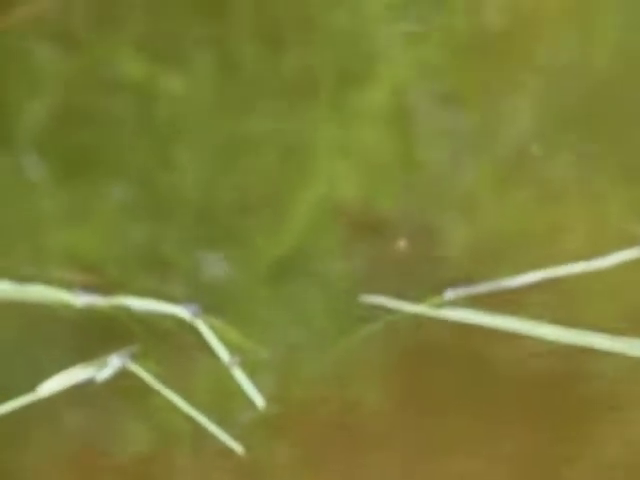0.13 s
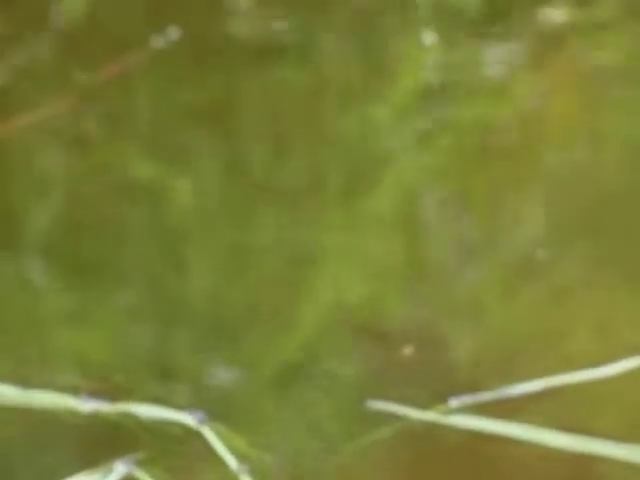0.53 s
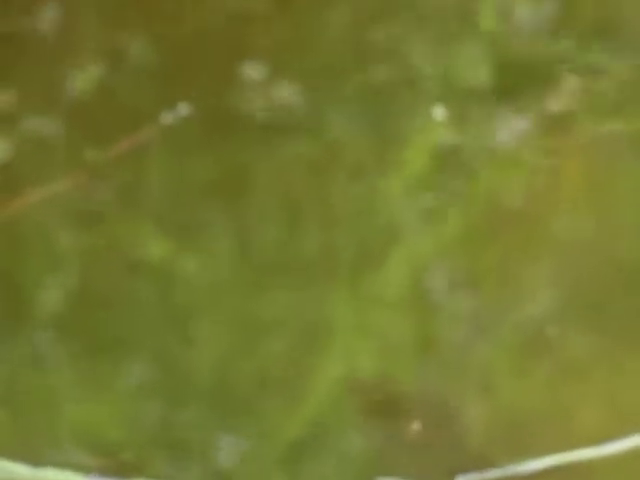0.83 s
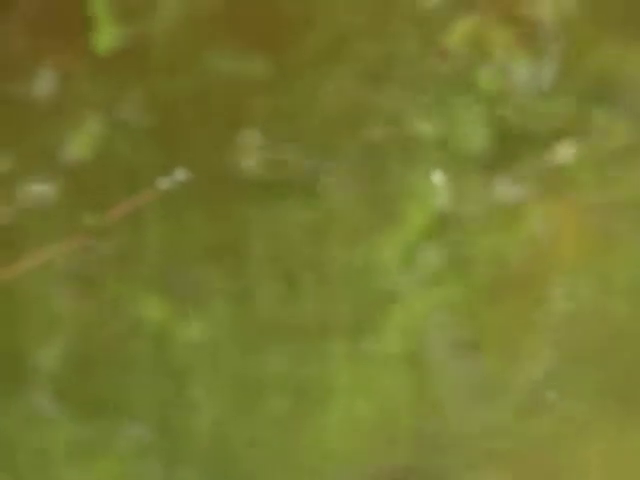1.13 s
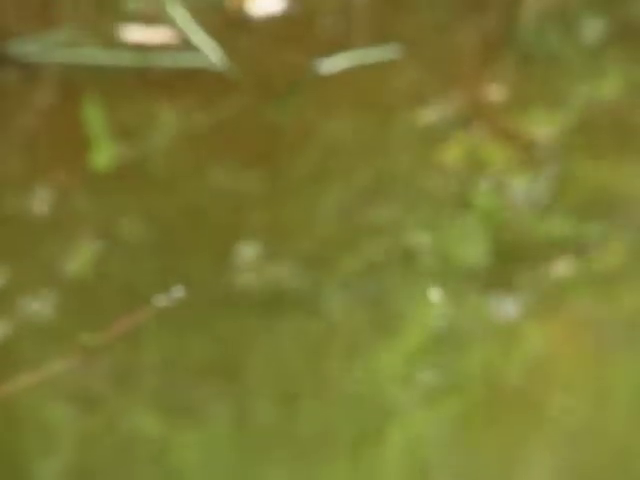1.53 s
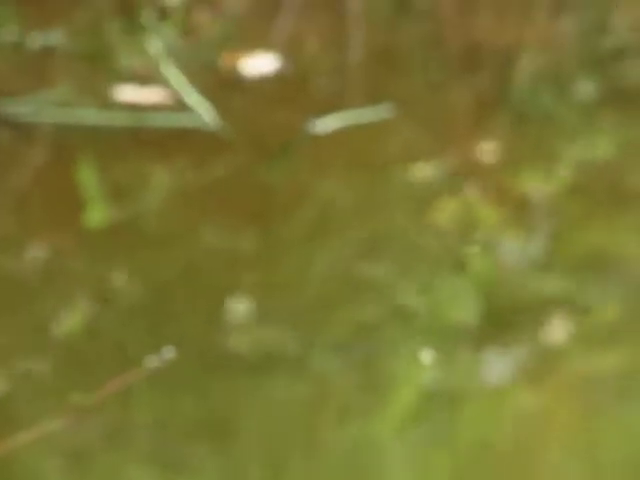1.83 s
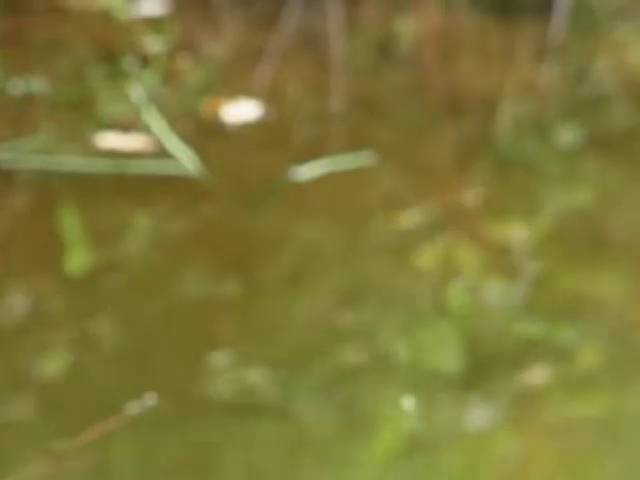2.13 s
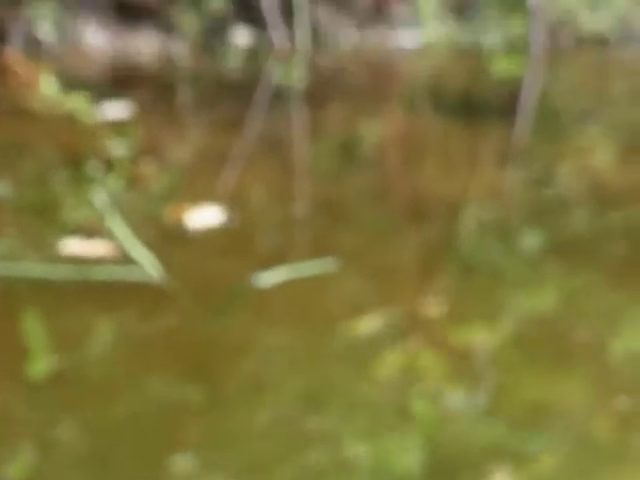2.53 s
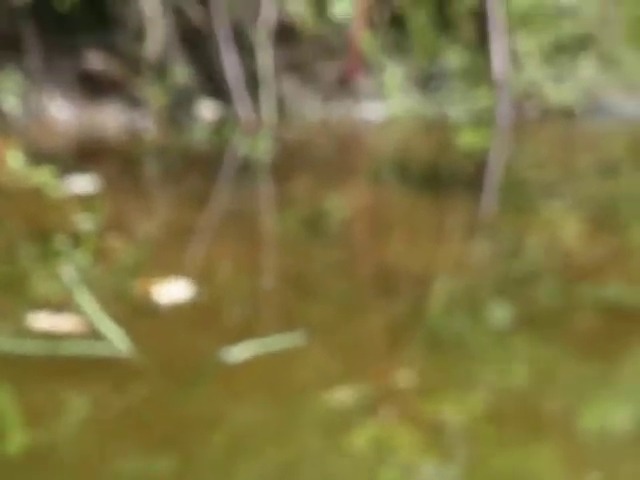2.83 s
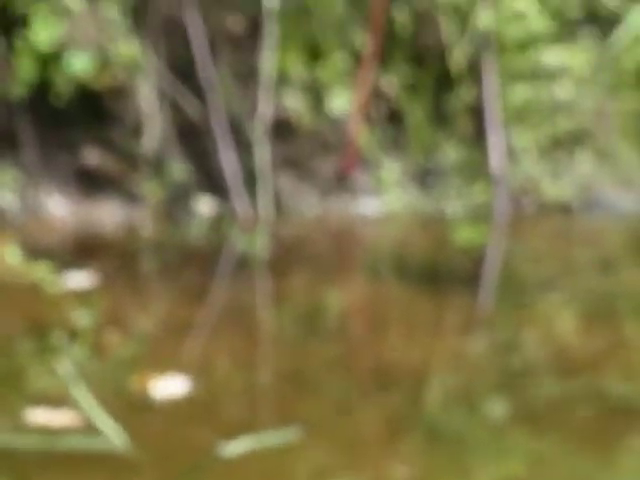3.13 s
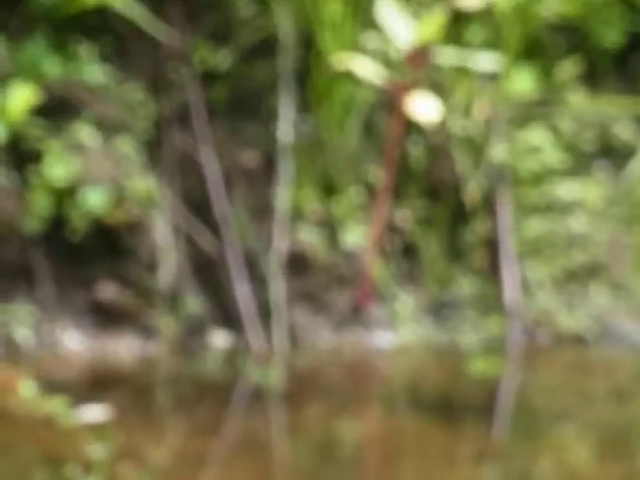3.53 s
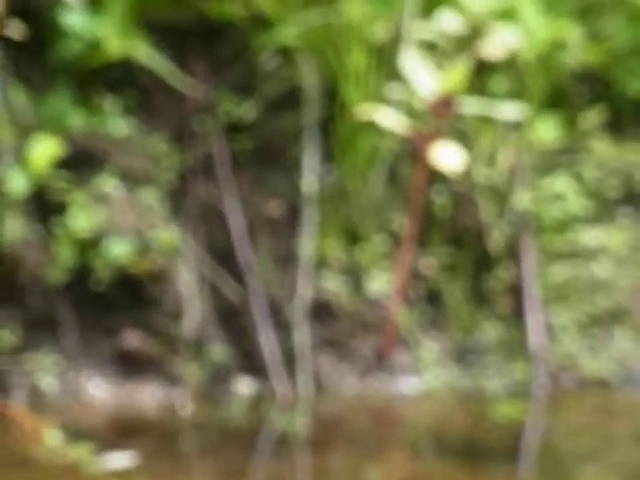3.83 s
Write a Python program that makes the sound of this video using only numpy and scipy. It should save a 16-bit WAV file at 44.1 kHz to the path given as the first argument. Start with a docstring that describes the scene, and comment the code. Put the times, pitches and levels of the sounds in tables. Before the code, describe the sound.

Soft, regular toad hoots carry on throughout beside a pond, faintly answered by a lower, distant toad. After a dry click close to the microphone, birds whistle and chirp, gradually getting louder, and a small hard knock comes last.

```python
"""At the edge of a pond, one microphone, quiet outdoor hiss throughout. A near toad starts at once,
hooting softly and regularly on pushes of air. Small birds whistle and chip in the trees around, which
throw their notes back, and a dry click sounds close to the microphone. A lower toad answers from far
off; faint high rustles and ticks come and go. From about halfway the birds trill and grow louder.
Near the end come a soft bump and a second sharp click, a hard little knock close by."""
import sys
import numpy as np
from scipy import signal
from scipy.fft import rfft, irfft
from scipy.io import wavfile

SR = 44100
rng = np.random.default_rng(int(sys.argv[2]) if len(sys.argv) > 2 else 0)


def unload_audio(sound):
    """Save the sound as a 16-bit wav file, at the path given as the first command line argument."""
    columns = np.transpose(np.atleast_2d(sound))
    # keep every value between -1 and 1, then stretch to whole-number steps
    steps = np.round(np.clip(columns, -1, 1) * 32767)
    wavfile.write(sys.argv[1], SR, steps.astype(np.int16))


N = 176400
TIME = np.arange(N) / SR

# Spectrum of the open air: f/Hz, relative level/dB
AIR_COLOUR = [(25, -20), (50, -11.5), (100, -7), (180, -6.5), (290, -5), (420, -7), (700, -9),
              (1600, -12.5), (2700, -11), (6000, -15), (11400, -17), (15800, -20.5)]
# Hoots of the toad at the near bank: t/s, length/s, f/Hz, level/dB
NEAR_HOOTS = [(0.085, 0.16, 554.6, -37.5), (.542, 0.17, 554, -37.5), (0.951, 0.16, 556, -37),
              (1.367, 0.17, 555.6, -37.5), (1.791, 0.16, 554.6, -37), (2.219, 0.16, 553.3, -37.5),
              (2.625, 0.16, 554.7, -37.5), (3.048, 0.16, 555.7, -37.5), (3.479, 0.17, 554.6, -37.5),
              (3.911, 0.14, 552.6, -38)]
# How long the trees hold an echo: f/Hz, time to fall 60 dB/s
TREE_DECAY = [(500, 1), (2500, 1), (5000, 0.45), (9000, 0.37)]
# Bird notes in the trees: t/s, length/s, start f/Hz, turn f/Hz, end f/Hz, place of the turn (0-1),
# flatness of the turn (exponent), level/dB, swell over the note/dB, echo/dB
BIRD_NOTES = [(0.096, .045, 7000, 5300, 5300, 0.73, 1.6, -54.5, -5, -5),
              (0.44, .045, 6700, 4850, 4520, 0.28, 1.7, -54, -10, -2),
              (1.054, 0.046, 5600, 5180, 4700, 0.6, 1.04, -61.5, 2, 5),
              (1.199, 0.064, 5200, 4630, 4270, 0.32, 0.96, -49.5, -8, 1.5),
              (1.207, 0.088, 2940, 2740, 2390, 0.06, 1.2, -60.5, -2, -0.5),
              (1.23, 0.023, 2990, 3520, 3930, 0.44, 1, -57.5, 4, 1),
              (1.344, 0.035, 4400, 3610, 2880, 0.75, 1.25, -55.5, 10, 2.5),
              (1.373, 0.1, 8200, 8000, 7340, 0.43, 0.84, -56, 7, 2.5),
              (1.475, 0.044, 5200, 3800, 3250, 0.6, 1.2, -57, -1, 4),
              (1.515, .075, 3150, 3900, 3920, 0.8, 1.8, -54.5, -3, 1.5),
              (1.635, .04, 4000, 3575, 3020, 0.62, 1.03, -50, 6, -1.5),
              (1.71, 0.06, 6400, 7070, 6420, 0.53, 0.98, -48, 4, 3),
              (1.774, 0.036, 4200, 3300, 2860, 0.72, 1.25, -52, 15, 2),
              (1.818, 0.029, 2800, 3090, 3500, .6, 1.04, -55, -6, -0.5),
              (2.21, 0.031, 3500, 2990, 2740, 0.48, 1.43, -46, 3, -4.5),
              (2.074, 0.12, 2060, 1950, 1870, 0.4, 0.95, -65.5, 3, 4),
              (2.25, .05, 2490, 2200, 2110, 0.65, 0.89, -58.5, 17, -6),
              (2.4, 0.052, 2700, 3410, 3760, 0.36, 0.92, -48, -6, -5.5),
              (2.485, 0.021, 3520, 3100, 2800, 0.4, 1, -53, 4, 1),
              (2.509, .025, 3310, 2885, 2560, 0.45, 0.96, -52, 3, -7),
              (2.537, 0.12, 2625, 2300, 2190, 0.52, 1, -59, -7, -7.5),
              (2.507, 0.16, 7700, 6807, 7100, 0.13, 1.68, -47, -7, 1.5),
              (2.64, .06, 8450, 8200, 8160, .5, 0.91, -64, -3, 1),
              (2.723, .084, 3600, 3914, 4148, .5, 1.22, -41.5, 11.5, -4.5),
              (2.872, 0.084, 3500, 3700, 4087, 0.3, 1.07, -41.5, 15, -6.5),
              (3.005, 0.097, 5100, 6427, 6433, .26, 3.25, -40, 2, 1.5),
              (3.221, 0.041, 5000, 4400, 4240, 0.48, 1.5, -60, -2, 8),
              (3.266, 0.066, 8870, 8450, 8160, .5, 1, -63, -2, -1),
              (3.371, .076, 5250, 5860, 4550, .36, 3.4, -36, 8, -2),
              (3.468, 0.054, 4000, 3290, 3090, 0.64, 1.3, -54.5, 6, -1),
              (3.491, 0.064, 8550, 8230, 8700, 0.17, 1.1, -46, -2, -1),
              (3.582, .052, 6640, 3753, 3530, .92, 1.9, -38, -4, -1.5),
              (3.687, .07, 5600, 6470, 4860, 0.38, 1.5, -37, 5.5, -0.5),
              (3.843, 0.054, 7200, 7080, 7540, 0.2, 1.2, -47, 3, 5.5),
              (3.892, 0.065, 7600, 7400, 6140, 0.43, 1.62, -45, 2, 2.5)]
# Bursts that merge into one dry click at the microphone: t/s, level/dB
CLICK_BURSTS = [(0.107, -26.5), (0.1061, -19.5), (0.1079, -19.5)]
# Spectrum of that click: f/Hz, gain/dB
CLICK_COLOUR = [(100, -37), (300, 9), (800, 1.5), (1700, 0.5), (3500, -8.5), (7000, 0), (11300, 4),
                (16000, 1)]
# Hoots from across the water: t/s, length/s, start f/Hz, end f/Hz, level/dB
DISTANT_HOOTS = [(.24, .18, 525, 461, -58.5), (.79, .2, 524, 474, -59), (1.17, 0.17, 490, 465, -56.5),
                 (1.69, 0.084, 498, 546, -56.5), (2.87, 0.17, 520, 508, -66), (3.08, 0.095, 494, 467, -60),
                 (3.62, 0.29, 503, 480, -60)]
# Faint rustles: centre t/s, width/s, level/dB
RUSTLE_SWELLS = [(.38, 0.18, -67.5), (1.42, 0.09, -59.5), (1.675, 0.013, -57.5), (2.52, .2, -68),
                 (3.247, 0.0056, -50.5), (3.36, 0.084, -65.5), (3.443, 0.0035, -54.5)]
# Spectrum of the rustles: f/Hz, relative level/dB
RUSTLE_SPECTRUM = [(100, -43), (6000, -11), (9000, -11), (11200, -4), (13000, -10), (16000, -46)]
# Trills in the trees: t/s, chip spacing/s, chip count, chip length/s, top f/Hz, bottom f/Hz,
# first level/dB, last level/dB, echo/dB
BIRD_TRILLS = [(1.832, .0751, 9, .022, 5350, 4200, -49, -43, 3),
               (1.915, .08, 4, .018, 3800, 2700, -52, -52, -2),
               (3.129, .0303, 8, .007, 6300, 4600, -52, -54, -2)]
# Knock close to the microphone: t/s, level/dB
CLOSE_KNOCKS = [(3.8191, 0)]
# Modes the knock sets ringing: f/Hz, level/dB, time to fall 60 dB/s, rise/s
RING_MODES = [(275, -2.5, 0.0063, 0.00074), (1620, -4.5, 0.0065, 0.00087), (2045, 6, 0.0034, 0.00032),
              (5800, -19, 0.004, .0002), (7430, -2, 0.004, 0.00032), (10100, -2, 0.0016, 0.000065),
              (11300, -1, 0.0023, .0003), (13500, -13, .001, 0.000059), (15300, -1, 0.0011, .00005)]


def amp(db):
    """Decibels to amplitude."""
    return 10 ** (np.asarray(db) / 20)


def unit(x):
    """Scales to unit RMS."""
    return x / np.sqrt(np.mean(x ** 2) + 1e-20)


def read(points, hz):
    """A table's value at hz, on a log frequency axis."""
    f, value = np.transpose(points)
    return np.interp(np.log(hz + 1), np.log(f + 1), value)


def add(mix, start, sound):
    """Mixes a sound in at start seconds."""
    part = mix[max(round(start * SR), 0):][:len(sound)]
    part += sound[:len(part)]


def coloured(x, colour):
    """Filters x by a table of gain against frequency."""
    return irfft(rfft(x) * amp(read(colour, np.fft.rfftfreq(N, 1 / SR))), N)


def wander(hz):
    """Random motion up to about hz, at unit RMS."""
    rolloff = np.exp(-(np.fft.rfftfreq(N, 1 / SR) / hz) ** 2)
    return unit(irfft(rfft(rng.standard_normal(N)) * rolloff, N))


def ramp(u):
    """A smooth step from 0 to 1."""
    return np.sin(np.pi / 2 * np.clip(u, 0, 1))


def hump(t, at_s, width_s):
    """A bell curve of height 1."""
    return np.exp(-((t - at_s) / width_s) ** 2)


def sine(pitch):
    """A pure tone following a pitch path in Hz."""
    return np.sin(2 * np.pi * np.cumsum(pitch) / SR)


def air(level_db=-54.5, murmur_hz=400, sway_db=2):
    """Open air all around: steady hiss over a gently swaying low murmur."""
    hiss = unit(coloured(rng.standard_normal(N), AIR_COLOUR))
    murmur = signal.sosfilt(signal.butter(1, murmur_hz, fs=SR, output="sos"), hiss)
    sway = amp(sway_db * wander(hz=3.7))
    return amp(level_db) * (hiss + murmur * (sway - 1))


def near_toad(rise_s=0.015, release_s=0.046, octave_db=-18, waver_db=0.079, echo_db=-32):
    """At the near bank: almost pure hoots that start sharp and sag as the air runs out."""
    sharp_hz, settle_s, sag_hz, sag_s = 17.3, 0.041, 24, 0.018
    hoots = np.zeros(N)
    for start, length, hz, db in NEAR_HOOTS:
        t = np.arange(0, length, 1 / SR)
        pitch = hz + sharp_hz * np.exp(-t / settle_s) - sag_hz * np.exp((t - length) / sag_s)
        push = 1 + 0.54 * hump(t, at_s=0.03, width_s=0.015)  # the first push of air swells the hoot
        octave = amp(octave_db) * hump(t, at_s=0.029, width_s=0.11) * sine(2 * pitch)
        gate = ramp(t / rise_s) * ramp((length - t) / release_s)
        add(hoots, start, amp(db) * gate * (push * sine(pitch) + octave))
    hoots *= amp(waver_db * wander(hz=43))
    return hoots + amp(echo_db) * trees(hoots)


def trees(sound, echoes_per_s=1500, build_s=0.023):
    """Trunks and leaves around the pond scatter echoes, each band dying at its own speed."""
    taps = rng.standard_normal(SR) * (rng.random(SR) < echoes_per_s / SR)
    taps *= ramp(TIME[:SR] / build_s)
    hz, t, bands = signal.stft(taps, SR, nperseg=256)
    decay = amp(-60 * t / read(TREE_DECAY, hz)[:, None])
    tail = signal.istft(bands * decay, SR, nperseg=256)[1]
    return signal.fftconvolve(sound, tail / np.linalg.norm(tail))[:N]


def birds(notes, warble_depth=0.0045, flutter_db=2.5, rise_share=0.11, fall_share=0.16):
    """Up in the trees: each note is a slightly unsteady sine, heard direct and thrown back."""
    direct, to_trees = np.zeros(N), np.zeros(N)
    warble = 1 + warble_depth * wander(hz=150)
    flutter = flutter_db * wander(hz=105)
    for start, pitch, db, echo_db in notes:
        u = np.linspace(0, 1, len(pitch))
        span = (round(start * SR) + np.arange(len(pitch))) % N
        gate = ramp(u / rise_share) * ramp((1 - u) / fall_share)
        note = amp(db + flutter[span]) * gate * sine(pitch * warble[span])
        add(direct, start, note)
        add(to_trees, start, note * amp(echo_db))
    return direct + trees(to_trees)


def whistles():
    """Single notes for the birds, each gliding through one turn of pitch."""
    for start, length, start_hz, turn_hz, end_hz, turn, flat, db, swell_db, echo_db in BIRD_NOTES:
        u = np.linspace(0, 1, round(length * SR))
        before = np.maximum(1 - u / turn, 0)
        after = np.maximum((u - turn) / (1 - turn), 0)
        pitch = turn_hz + (start_hz - turn_hz) * before ** flat + (end_hz - turn_hz) * after ** flat
        yield start, pitch, db + swell_db * (u - 0.5), echo_db


def dry_click(decay_s=0.00092):
    """Close to the microphone: tiny bursts of noise run together into one crackling click."""
    bursts, t = np.zeros(N), TIME[:2048]
    for start, db in CLICK_BURSTS:
        add(bursts, start, amp(db) * np.exp(-t / decay_s) * rng.standard_normal(len(t)))
    return coloured(bursts, CLICK_COLOUR)


def far_toad(rise_share=0.067, fall_share=0.38, echo_db=-3):
    """Across the water: faint, lower, gliding hoots, nearly as much echo as direct sound."""
    hoots = np.zeros(N)
    for start, length, start_hz, end_hz, db in DISTANT_HOOTS:
        u = np.linspace(0, 1, round(length * SR))
        gate = ramp(u / rise_share) * ramp((1 - u) / fall_share)
        add(hoots, start, amp(db) * gate * sine(start_hz + (end_hz - start_hz) * u))
    return hoots + amp(echo_db) * trees(hoots)


def rustles(grain_db=5):
    """Faint swells of high, grainy noise; the shortest are heard as ticks."""
    swells = sum(amp(db) * hump(TIME, centre, width) for centre, width, db in RUSTLE_SWELLS)
    hiss = unit(coloured(rng.standard_normal(N), RUSTLE_SPECTRUM))
    return swells * hiss * amp(grain_db * wander(hz=300))


def trills(fade_db=-3):
    """Quick runs of notes for the birds, each chip weakening as its pitch falls."""
    for start, spacing, count, length, top_hz, bottom_hz, first_db, last_db, echo_db in BIRD_TRILLS:
        u = np.linspace(0, 1, round(length * SR))
        pitch = top_hz + (bottom_hz - top_hz) * u
        for k, db in enumerate(np.linspace(first_db, last_db, count)):
            yield start + k * spacing, pitch, db + fade_db * (u - 0.5), echo_db


def bump(at_s=3.648, hz=128, level_db=-49):
    """A soft low bump, only a couple of cycles long."""
    return amp(level_db) * hump(TIME, at_s, width_s=0.0067) * np.sin(2 * np.pi * hz * (TIME - at_s))


def knock(low_cut_hz=95):
    """Close to the microphone: a hard little knock whose modes ring for milliseconds."""
    knocks, t = np.zeros(N), TIME[:2048]
    ring = sum(amp(db - 60 * t / t60) * (1 - np.exp(-t / rise)) * np.sin(2 * np.pi * hz * t)
               for hz, db, t60, rise in RING_MODES)
    for start, db in CLOSE_KNOCKS:
        add(knocks, start, amp(db) * ring)
    return signal.sosfilt(signal.butter(2, low_cut_hz, "high", fs=SR, output="sos"), knocks)


def scene():
    """The pond as it reaches one microphone on the bank."""
    pond = air() + near_toad() + birds([*whistles(), *trills()])
    return (pond + dry_click() + far_toad() + rustles() + bump() + knock())[None]


def record(dry):
    """The recorder's band limit cuts off the highest treble."""
    edge_hz = 15900
    low_pass = signal.firwin(511, edge_hz, window=("kaiser", 9), fs=SR)
    return signal.oaconvolve(dry, low_pass[None], "same")


dry = scene()
out = record(dry)
unload_audio(out)
```